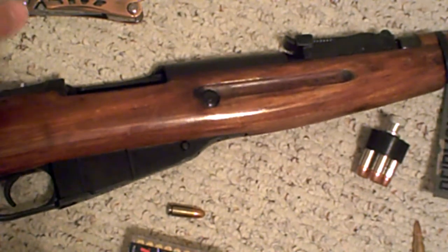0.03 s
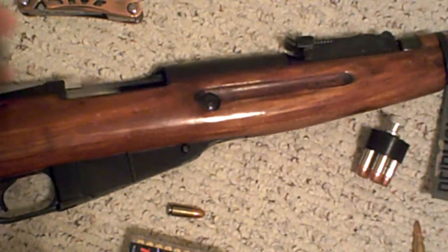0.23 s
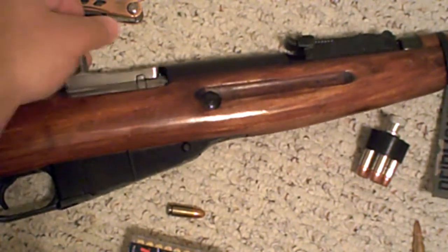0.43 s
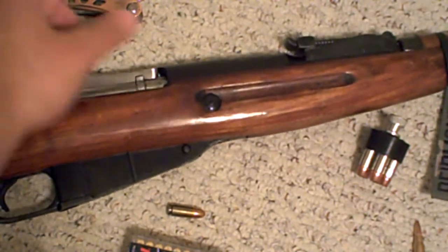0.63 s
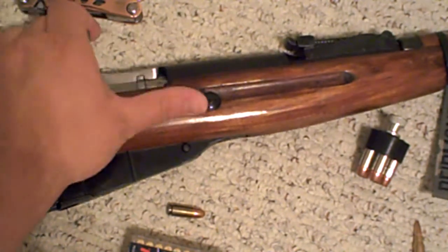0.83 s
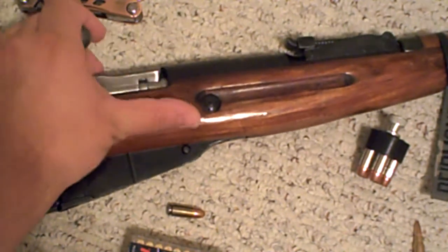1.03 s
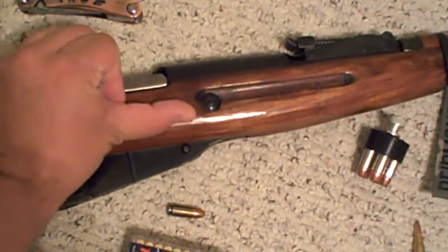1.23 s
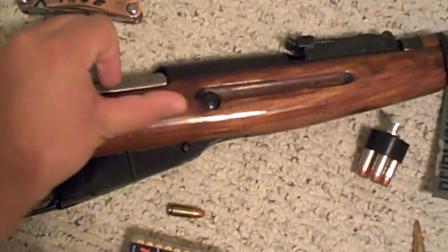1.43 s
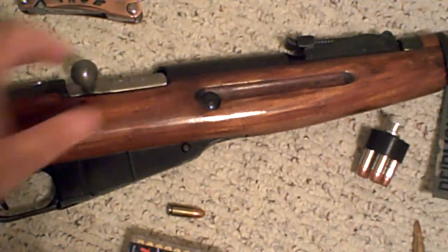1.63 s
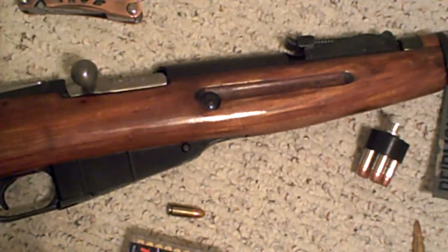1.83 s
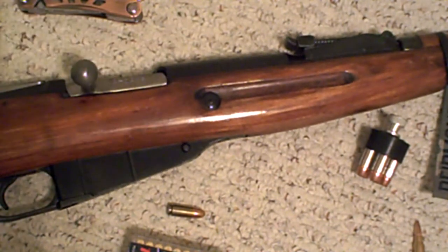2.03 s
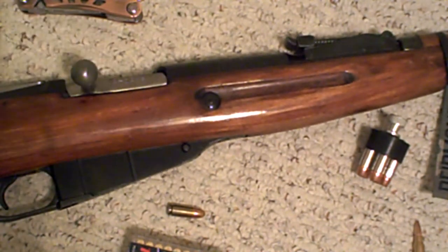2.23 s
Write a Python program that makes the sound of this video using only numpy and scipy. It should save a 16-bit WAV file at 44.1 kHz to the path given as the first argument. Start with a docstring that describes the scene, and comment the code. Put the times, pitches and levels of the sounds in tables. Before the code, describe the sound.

A steel rifle bolt slides forward with a rattle, slams home, then clicks as it turns down

```python
"""Rifle bolt closing.

A steel bolt slides forward, rattles along the receiver, seats and is turned down, close to a camera.
Each contact is a short noise crack with decaying sine modes of the bolt; sagging sines knock in the stock.
Sparse random catches make the rubbing; a carpeted room answers with decaying noise.
Afterwards a withdrawing arm brushes the carpet, as swells of band noise over steady hiss."""
import sys
import numpy as np
from scipy import signal
from scipy.fft import rfft, irfft, next_fast_len
from scipy.io import wavfile
from scipy.ndimage import uniform_filter1d

SR = 44100
rng = np.random.default_rng(int(sys.argv[2]) if len(sys.argv) > 2 else 0)


def voltage_ratio(decibels):
    """Convert decibels (scalar or array-like) to amplitude ratios, 20 dB per decade."""
    exponent = np.asarray(decibels, float) / 20
    return 10 ** exponent


def transcribe(u):
    """Save the signal u as a 16-bit wav file named by the first command-line argument.

    u: samples, shape (n,) or (channels, n), limited to [-1, 1]; the rate is SR.
    q: integer samples, one column per channel.
    """
    v = np.clip(np.atleast_2d(u).T, -1, 1)
    q = np.round(v * 32767).astype(np.int16)
    wavfile.write(sys.argv[1], SR, q)


N = 100327  # samples


def unit(x):
    """Scales x to rms 1."""
    return x / np.sqrt(np.mean(x ** 2) + 1e-20)


def along(points, hz):
    """Interpolates (Hz, value) points on a log frequency axis."""
    point_hz, value = np.transpose(points)
    return np.interp(np.log(hz + 1), np.log(point_hz + 1), value)


def octaves(hz, centre_hz):
    """Distance from a centre in octaves; the 50 Hz offset keeps 0 Hz finite."""
    return np.log2((hz + 50) / centre_hz)


def filtered(x, gain_db):
    """Filters x causally (minimum phase, by folding the cepstrum) with gain_db(hz)."""
    size = 2 * next_fast_len(len(x) // 2 + 2048)
    gain = voltage_ratio(gain_db(np.fft.rfftfreq(size, 1 / SR))) + 1e-6
    cepstrum = irfft(np.log(gain), size)
    cepstrum[1:size // 2] *= 2
    cepstrum[size // 2 + 1:] = 0
    return irfft(rfft(x, size) * np.exp(rfft(cepstrum)), size)[:len(x)]


# Steel contacts. Each row: start in seconds, level in dB (before CONTACT_TRIM_DB),
# treble tilt in dB per octave, crack t60 in seconds, bolt ringing in dB re the contact.
STEEL_CONTACTS = [(.072, -53.5, -9, 0.055, -43), (.1228, -42.5, -7, 0.024, -49),
                  (.1434, -73.5, 6, 0.059, -30), (.174, -47, -13.5, 0.014, -40),
                  (0.1972, -38, -4, 0.01, -40), (.207, -31.5, -1, 0.019, -36), (.226, -36, 7.5, 0.038, -39),
                  (.2374, -33, 3, .03, -37), (.2453, -17.5, 1, .015, -39),
                  (.2858, -29.5, -0.5, .018, -32.5), (.2924, -37, 2.5, 0.058, -36),
                  (.2997, -27, 1, 0.056, -24), (.3155, -29, 3, .03, -30), (.3326, -26.5, 2, .015, -38.5),
                  (.3462, -25, 1.5, 0.014, -35), (.3626, -10, 5, 0.023, -22.5),
                  (.3743, -19.5, -1, .04, -39.5), (.3844, -25, -4.5, .04, -28), (.413, -8.5, 2, 0.049, -9),
                  (.608, -37, -8.5, 0.04, -48), (.7045, -37.5, -0.5, 0.07, -35),
                  (0.7093, -32, -9.5, 0.035, -40), (.722, -26.5, -25, 0.053, -37),
                  (.7258, -21, 2.24, .028, -20), (.827, -42.5, -1, .015, -40),
                  (.8345, -30, -10.5, 0.023, -43), (.9955, -40, -7, 0.022, -41),
                  (1.0032, -23, -4.5, 0.0078, -44), (1.0093, -24.5, -2, 0.012, -42.5),
                  (1.0114, -8, 0.5, 0.031, -50), (1.015, -7.5, 3.5, 0.011, -36),
                  (1.138, -31, -10.5, 0.09, -40), (1.1412, -22.5, 8.5, 0.013, -35),
                  (1.1465, -31, 8, 0.0067, -43), (1.1622, -16, -0.5, 0.04, -41),
                  (1.1715, -19, 3.5, 0.04, -49), (1.174, -14.5, 0, 0.038, -40),
                  (1.384, -52.5, -7, .02, -32), (1.546, -49, -14, .02, -42)]
CONTACT_TRIM_DB, RISE_S = -9, 0.00042
SNAP_DB = -8  # first instant of a contact, energy re its crack


def contacts():
    """Steel on steel: a noise crack, a snap and the bolt's modes; the room scatters the crack's energy."""
    out = np.zeros(N + SR)
    t = np.arange(SR // 2) / SR
    rise = 1 - np.exp(-t / RISE_S)
    for start_s, level_db, tilt_db, t60_s, ring_db in STEEL_CONTACTS:
        gain_db = lambda hz: colour(hz, tilt_db)
        noise = filtered(rng.standard_normal(len(t)), gain_db)
        crack = unit(noise) * voltage_ratio(-60 * t / t60_s) * rise
        blow = filtered((t == 0) * 1., gain_db)
        blow = blow * np.linalg.norm(crack) / np.linalg.norm(blow)
        snap = voltage_ratio(SNAP_DB) * np.roll(blow, round(2 * RISE_S * SR))
        ringing = voltage_ratio(ring_db) * rise * ring(t)
        contact = crack + snap + room(blow) + ringing
        out[round(start_s * SR):][:len(t)] += voltage_ratio(level_db + CONTACT_TRIM_DB) * contact
    return out[:N]


# Untilted spectrum of the rifle. Each row: frequency in Hz, relative density in dB per Hz.
RIFLE_SPECTRUM = [(18, -69.5), (60, -51), (200, -35), (330, -14.5), (600, -9.5), (900, -4), (1430, 2),
                  (2200, 3), (3200, 1.5), (4500, 0.5), (6550, -1.5), (8300, -7), (10300, -10), (11500, -22),
                  (16000, -25)]
PIVOT_HZ, TILT_TOP_HZ = 1800, 8400


def colour(hz, tilt_db):
    """The rifle's spectrum in dB; harder contacts lift the treble up to TILT_TOP_HZ, softer ones lower it."""
    top_octaves = octaves(TILT_TOP_HZ, PIVOT_HZ) if tilt_db > 0 else 4
    return along(RIFLE_SPECTRUM, hz) + tilt_db * np.clip(octaves(hz, PIVOT_HZ), 0, top_octaves)


# Modes of the bolt. Each row: frequency in Hz, mean relative level in dB, t60 in seconds.
BOLT_MODES = [(5540, -8, .04), (6755, -3, .04), (10050, -5, .07), (10094, -30, .3), (10112, -28, .32),
              (10160, -3, .08), (14730, -26, .11)]
MODE_SCATTER_DB = 5


def ring(t):
    """The bolt's modes struck once: decaying sines, each at a new strength."""
    hz, db, t60_s = np.transpose(BOLT_MODES)[:, :, None]
    level_db = db + MODE_SCATTER_DB * rng.standard_normal(hz.shape)
    return np.sum(voltage_ratio(level_db - 60 * t / t60_s) * np.sin(2 * np.pi * hz * t), axis=0)


# Knocks into the wooden stock. Each row: start in seconds, level in dB (before rise and decay),
# starting pitch in Hz, t60 in seconds.
STOCK_KNOCKS = [(0.071, -56.5, 1322, 0.078), (0.129, -56.5, 1244, 0.046), (0.1978, -42.5, 1548, 0.076),
                (0.2068, -36, 1484, 0.1), (0.207, -32.5, 2490, 0.03), (0.23, -34.5, 2840, 0.034),
                (.249, -37.5, 1250, 0.055), (.414, -28.5, 1460, 0.069), (0.4148, -15.5, 1770, 0.025),
                (0.581, -45.5, 1348, 0.038), (.707, -41, 1680, 0.034), (0.834, -49, 896, 0.067),
                (.8352, -50.5, 2050, 0.044), (1.012, -23.5, 2130, 0.012), (1.0125, -33, 822, 0.047),
                (1.013, -44.5, 381, 0.05), (1.1626, -18, 2990, 0.014), (1.143, -50, 1915, 0.027),
                (1.175, -42.5, 638, 0.082), (1.183, -55, 220, 0.059)]
KNOCK_RISE_S, KNOCK_UNREST_RAD, KNOCK_SAG_PER_S = 0.002, 0.7, 2.5


def knocks():
    """Hollow knocks of the wood: decaying sines of unsteady phase, sagging exponentially in pitch."""
    t = np.arange(N) / SR
    out = np.zeros(N)
    for start_s, level_db, hz, t60_s in STOCK_KNOCKS:
        after_s = np.maximum(t - start_s, 0)
        smooth = uniform_filter1d(uniform_filter1d(rng.standard_normal(N), size=150), size=150)
        unrest = KNOCK_UNREST_RAD * unit(smooth)
        turns = hz * (1 - np.exp(-KNOCK_SAG_PER_S * after_s)) / KNOCK_SAG_PER_S
        envelope = voltage_ratio(level_db - 60 * after_s / t60_s) * (1 - np.exp(-after_s / KNOCK_RISE_S))
        out += envelope * np.sin(2 * np.pi * turns + unrest)
    return out + room(out)


# The rifle jolts on the floor. Each row: start in seconds, peak in dB.
FLOOR_JOLTS = [(0.302, -70), (0.361, -54.5), (.413, -50), (0.727, -63), (1.014, -60)]
THUD_RISE_S = 0.00076


def thuds():
    """Low pushes of the jolting rifle: one-sided pulses that peak after THUD_RISE_S."""
    t = np.arange(N) / SR
    out = np.zeros(N)
    for start_s, peak_db in FLOOR_JOLTS:
        rises = np.maximum(t - start_s, 0) / THUD_RISE_S
        out += voltage_ratio(peak_db) * rises * np.exp(1 - rises)
    return out


# Rubbing level. Each row: time in seconds, direct level in dB.
RUB_LEVEL = [(.04, -78), (.09, -85), (.16, -69), (.19, -64), (.21, -49), (.24, -43), (.265, -44),
             (.282, -57), (.305, -40.5), (.325, -41.5), (.355, -55.5), (.38, -40), (.41, -48), (.43, -68)]
# The channel's broad resonance. One row: centre in Hz, width in octaves, boost in dB.
CHANNEL_HUMP = (2300, 0.39, 2.8)
CATCHES_PER_S, CATCH_SCATTER_DB, RUB_TILT_DB = 3500, 3, -4.5


def slide():
    """The bolt rubs in its channel: dense tiny catches in the rifle's colour."""
    hump_hz, hump_octaves, hump_db = CHANNEL_HUMP
    catches = (rng.random(N) < CATCHES_PER_S / SR) * rng.standard_normal(N)
    catches = catches * voltage_ratio(CATCH_SCATTER_DB * rng.standard_normal(N))

    def gain_db(hz):
        hump = hump_db * np.exp(-(octaves(hz, hump_hz) / hump_octaves) ** 2)
        return colour(hz, RUB_TILT_DB) + hump

    time_s, level_db = np.transpose(RUB_LEVEL)
    level = voltage_ratio(np.interp(np.arange(N) / SR, time_s, level_db, -120, -120))
    rub = unit(filtered(catches, gain_db)) * level
    return rub + room(rub)


# Carpet brushes. Each row: middle in seconds, half length in seconds, noise rms in dB at the middle,
# band centre in Hz.
CARPET_BRUSHES = [(1.758, 0.12, -73, 7300), (2.11, 0.22, -69, 5470)]
BRUSH_OCTAVES = 0.69  # 6 dB down this far from the centre


def brushes():
    """Cloth on carpet: soft cosine swells of band noise."""
    t = np.arange(N) / SR
    out = np.zeros(N)
    for middle_s, half_s, level_db, centre_hz in CARPET_BRUSHES:
        swell = np.cos(np.pi / 2 * np.clip((t - middle_s) / half_s, -1, 1))
        gain_db = lambda hz: -6 * (octaves(hz, centre_hz) / BRUSH_OCTAVES) ** 2
        out += voltage_ratio(level_db) * swell * unit(filtered(rng.standard_normal(N), gain_db))
    return out


# Decay of the carpeted room. Each row: frequency in Hz, t60 in seconds (of the early part).
ROOM_DECAY = [(200, 0.59), (600, 0.47), (1500, 0.28), (4000, 0.23), (9000, 0.22), (15000, 0.12)]
ROOM_DB, ROOM_DELAY_S = -8, 0.0037
LATE_DB, LATE_STRETCH = -19, 2.9  # far end of the room, dying more slowly


def room(x):
    """The room's answer to x: a fresh noise tail in which each frequency dies at its own speed."""
    hz, t, cells = signal.stft(rng.standard_normal(SR // 2), SR, nperseg=128)
    fall_db = -60 * t / along(ROOM_DECAY, hz)[:, None]
    decay = np.hypot(voltage_ratio(fall_db), voltage_ratio(LATE_DB + fall_db / LATE_STRETCH))
    tail = signal.istft(cells * decay, SR, nperseg=128)[1]
    tail = np.pad(tail / np.linalg.norm(tail), (round(ROOM_DELAY_S * SR), 0))
    return voltage_ratio(ROOM_DB) * signal.fftconvolve(x, tail)[:len(x)]


# Spectrum of the hiss. Each row: frequency in Hz, relative density in dB per Hz.
HISS_SPECTRUM = [(15, -54), (25, -31), (190, -8.5), (293, 1.5), (575, -3), (775, -3), (962, -2), (1190, -1),
                 (1480, -4), (3250, -7), (4870, -12), (16000, -26.5)]
HISS_RMS_DB = -68.5


def hiss():
    """Steady air and microphone noise: shaped Gaussian noise."""
    noise = filtered(rng.standard_normal(N), lambda hz: along(HISS_SPECTRUM, hz))
    return voltage_ratio(HISS_RMS_DB) * unit(noise)


def scene():
    """Sums all sources at one microphone."""
    return (contacts() + knocks() + thuds() + slide() + brushes() + hiss())[None]


def low_pass(x):
    """Removes everything above the highest recorded frequency."""
    return signal.sosfilt(signal.butter(12, 16520, fs=SR, output="sos"), x)


def record(dry):
    """The camera rolls off above 15600 Hz, 1 dB per 20 Hz down to -100 dB."""
    kept = filtered(dry[0], lambda hz: -np.clip((hz - 15600) / 20, 0, 100))[None]
    return low_pass(kept)


dry = scene()
out = record(dry)
transcribe(out)
```